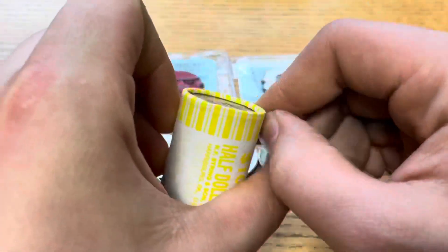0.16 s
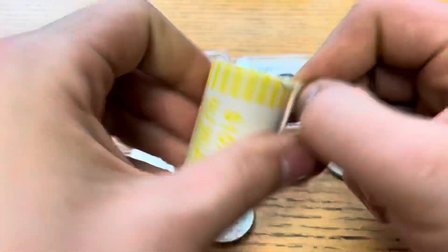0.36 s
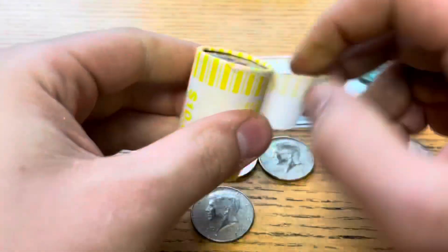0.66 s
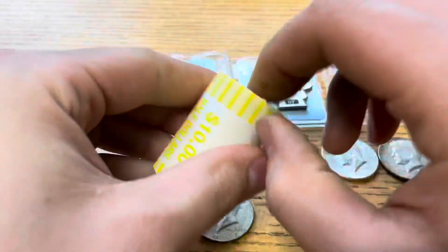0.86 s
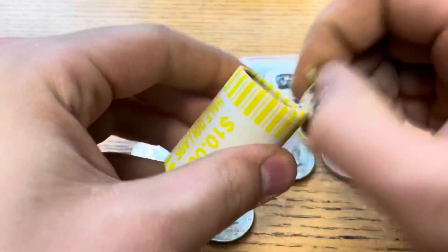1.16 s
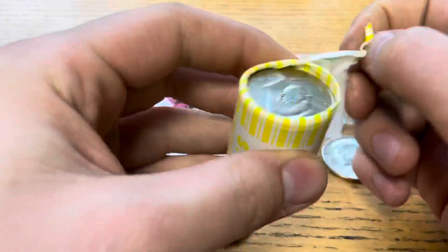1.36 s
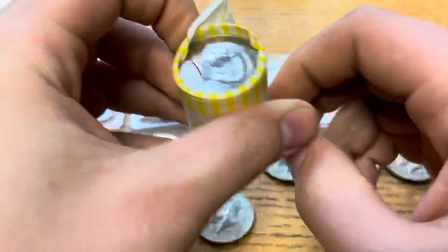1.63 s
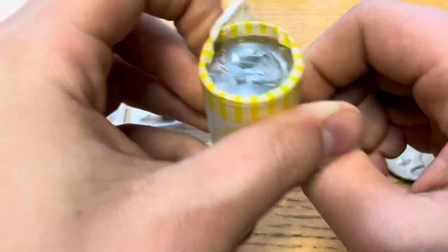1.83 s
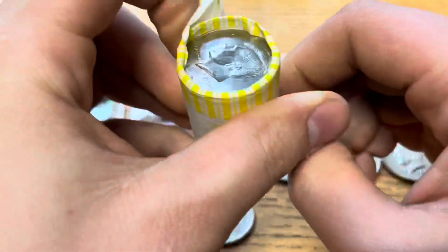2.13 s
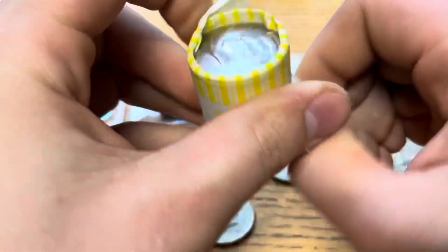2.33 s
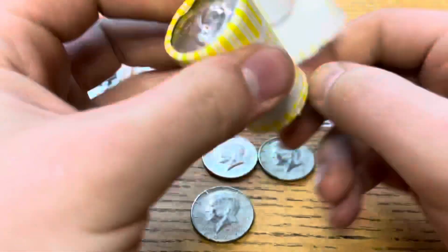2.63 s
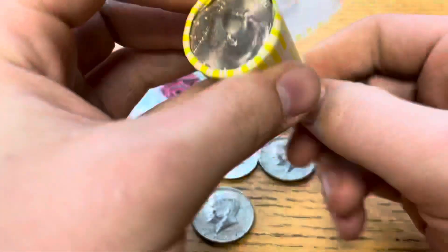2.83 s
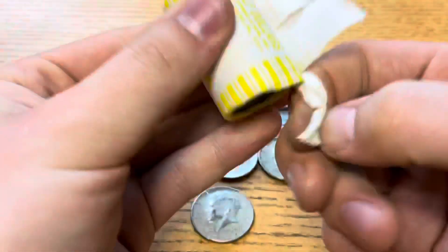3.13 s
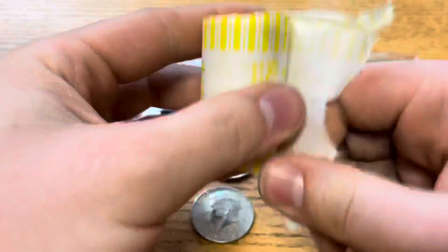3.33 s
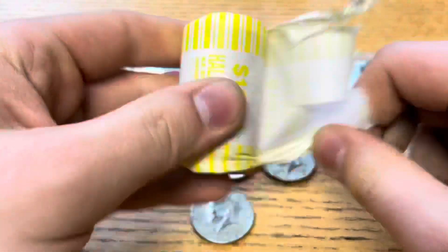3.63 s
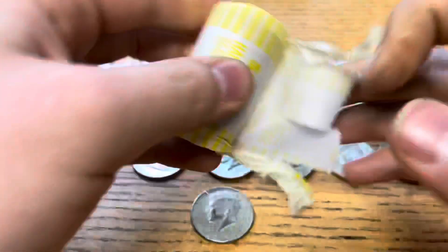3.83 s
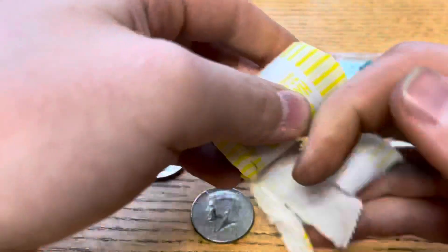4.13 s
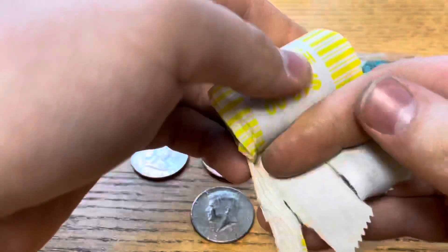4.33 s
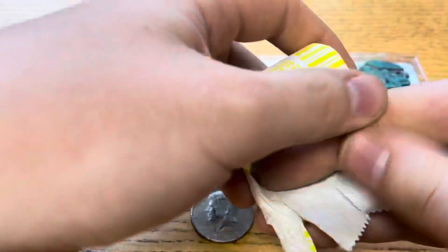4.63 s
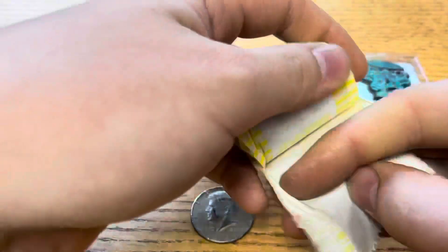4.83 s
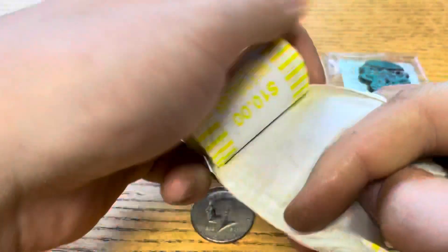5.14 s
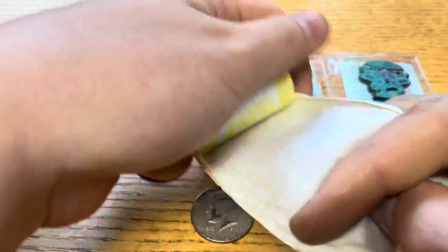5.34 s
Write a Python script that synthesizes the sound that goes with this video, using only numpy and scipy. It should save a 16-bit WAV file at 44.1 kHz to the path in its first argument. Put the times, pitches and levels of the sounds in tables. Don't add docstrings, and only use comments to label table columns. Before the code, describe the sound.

Near, crisp paper sounds over a low, faint air rumble: a brief bright rip, scattered ticks and soft thuds of fingers on the roll, a quiet pause, then another quick rip with papery flutter. Irregular crinkles and a strong snap lead to a dense burst of wide, hollow ripping and snapping. Indoors at a table, almost no reverberation, close stereo phone microphones.

```python
import sys
import numpy as np
from scipy import signal
from scipy.fft import rfft, irfft, next_fast_len
from scipy.io import wavfile
from scipy.ndimage import uniform_filter1d, map_coordinates

SR = 44100
rng = np.random.default_rng(int(sys.argv[2]) if len(sys.argv) > 2 else 0)


def field_ratio(decibels):
    return 10 ** (np.asarray(decibels, dtype=float) / 20)


def unload_wav(signal):
    wavfile.write(
        sys.argv[1],
        SR,
        np.round(np.clip(np.atleast_2d(signal).T, -1, 1) * 32767).astype(np.int16),
    )


N = 242285
COARSE_S = np.arange(0, N + 32, 32) / SR

# (frequency [Hz], gain [dB])
FIBRE_GAIN = [(5000, -38), (7000, -7), (9000, 2), (11000, -3), (13000, -1), (15000, -3), (16300, -32),
              (16900, -62.5)]
# (frequency [Hz], gain [dB])
FLAP_GAIN = [(2500, -40), (3500, -2.5), (4300, -2), (5400, -1.5), (6000, -0.5), (7200, 4), (9500, -36.5)]
# (frequency [Hz], gain [dB])
BELLY_GAIN = [(1300, -34.5), (2100, -6), (2600, -2.5), (3100, -4), (3600, -2.5), (4500, -34)]
# (frequency [Hz], width [Hz], gain [dB])
HOLLOW_MODES = [(368, 660, -7), (950, 160, 1), (1560, 350, -2)]

# (time [s], level [dB], flap width [0-1])
CONTACT = [(0, -81, 0.7), (.15, -78, 0), (0.499, -75, 0.4), (.65, -59, 0.83), (.8, -70, 0.34),
           (.95, -75, 0), (1.281, -60, 0.92), (1.55, -66, 0.54), (2.179, -73, 0.54), (2.45, -69, 0.94),
           (2.7, -86, 0.6), (2.901, -58, 0.46), (3.071, -64, 0.84), (3.65, -63, 0.85), (4, -49.5, 0.77),
           (4.55, -57, 0.77), (5.01, -47.5, 0.87), (5.49, -45, 0.86)]
# (start [s], length [s], level [dB], first width [0-1], last width [0-1])
RIPS = [
    (0.275, 0.15, -20, 0.27, 0.94),
    (2.216, 0.06, -41.5, -.2, -.2),
    (2.297, 0.11, -24.5, 0.12, 0.86),
    (3.366, 0.093, -29.5, 0.66, 0.92),
    (4.899, 0.076, -24, .7, 0.75),
    (5.192, 0.068, -25.5, 0.74, 0.89),
]
# (share of length [0-1], level [dB], share of widening [0-1])
RIP_SHAPE = [(0, -1, 0.024), (0.499, -1, 0.72), (.85, -4, 0.85), (1, -11, 0.89)]
# (release [s], build-up [s], level [dB], width [0-1], slack [dB])
PEELS = [(0.261, 0.08, -33.5, 0.52, -13), (0.571, 0.087, -44.5, 0.78, 2), (0.889, 0.044, -43.5, 0.66, -3),
         (1.177, 0.11, -35.5, 0.41, 6.5), (1.204, 0.11, -32.5, 0.57, 5.5), (1.363, 0.16, -46.5, 0.82, -1.5),
         (1.645, 0.044, -59, 0.23, 5), (1.923, 0.047, -53.5, 0.35, 4), (2.027, 0.041, -56.5, 0.43, 6),
         (2.301, 0.092, -26, 0.15, -3.5), (2.325, 0.05, -31.5, .4, 12), (2.506, 0.02, -49, 1.24, -8),
         (2.623, 0.18, -49.5, 0.72, -0.5), (2.718, 0.094, -56.5, 0.89, -5),
         (2.828, 0.066, -47.5, 0.6, -2.5), (3.102, 0.03, -39.5, 0.54, 0.5), (3.26, 0.13, -41.5, 0.74, 1),
         (3.582, .09, -37.5, 0.88, -1.5), (4.213, 0.14, -37, 0.93, 7), (4.346, 0.044, -45, 0.92, 1),
         (4.656, 0.086, -41, 0.82, -0.5), (4.901, 0.23, -27, 0.76, 3), (5.111, 0.056, -36, 0.92, 0),
         (5.444, 0.37, -39, 0.97, 0.5)]
# (start [s], dying [s], level [dB], width [0-1], slack [dB])
FLICKS = [
    (0.194, 0.14, -47, .35, -19),
    (0.704, 0.051, -44, 0.9, -5),
    (1.012, 0.17, -42, 0.05, 11.5),
    (2.212, 0.35, -43.5, 0.56, -1),
    (2.951, 0.098, -32, 0.51, 6.5),
    (3.301, 0.28, -33, 0.63, -2),
    (3.726, 1, -49, 0.9, -2),
    (4.418, 0.14, -38, 0.92, -1),
]
# (start [s], length [s], first pitch [Hz], last pitch [Hz], share [dB])
SINGS = [
    (.305, .15, 3400, 1000, -2.5),
    (2.344, .072, 2600, 1200, -1),
    (3.55, .06, 912, 921, 5.5),
    (4.047, .028, 1650, 1640, 11),
    (4.155, 0.022, 950, 956.6, 1),
    (4.184, .04, 4050, 3850, 2),
    (4.88, .11, 1235, 1020, -5),
    (5.21, 0.02, 1154, 1067, 0.5),
]

# (time [s], peak [dB], flap below fibre [dB])
EARLY_SPLITS = [(0.1127, -58, 18), (0.1352, -50, 16), (0.2126, -32, 17), (0.2185, -25, 15.5),
                (0.2476, -30, 19), (0.2651, -22, 25.5), (0.2733, -19, 23.5), (0.276, -17, 24),
                (0.278, -13.5, 20.5), (0.3166, -15, 13.5), (0.3294, -17, 17), (0.334, -16, 14),
                (0.3361, -12, 12.5), (0.3601, -17, 10), (0.3684, -14, 7), (0.3707, -16, 10.5),
                (0.376, -16, 0), (0.3923, -11, 8), (0.404, -22.5, 13), (0.414, -16, 12.5), (0.4172, -15, 17),
                (0.4341, -27, 8), (0.699, -37, -0.5), (0.7193, -31, 15), (0.8028, -56, 13.5),
                (0.9871, -49, 11), (0.9893, -49, 18), (1.0139, -28, 7.5), (1.0964, -31, 13),
                (1.1059, -35, 17), (1.1113, -36, 12.5), (1.1312, -33, 15), (1.154, -32, 8.5),
                (1.1706, -27, 9), (1.1724, -28, 9), (1.1894, -30, 10.5), (1.1914, -28, 11), (1.1961, -33, 8),
                (1.2035, -35, 6), (1.2298, -30, 9), (2.1191, -45.5, 27.5), (2.1278, -45, 21),
                (2.1587, -48.5, 20), (2.1668, -53, 18.5), (2.2218, -23, 12), (2.2283, -21, 11),
                (2.2332, -19, 26), (2.2376, -21, 28), (2.2469, -23, 19), (2.25, -18, 26), (2.2549, -24, 23),
                (2.26, -27, 25), (2.272, -24, 28), (2.2933, -17, 8), (2.301, -17, 8), (2.304, -17, 3),
                (2.3174, -8.5, 15), (2.345, -24, 15), (2.3489, -25, 10)]
# (time [s], peak [dB], flap below
# fibre [dB])
LATE_SPLITS = [(2.3526, -18, 9), (2.3651, -18, 9), (2.3739, -24, 11), (2.397, -21, 8), (2.3992, -24, 10),
               (2.4033, -24, 8), (2.414, -29, 6), (2.7597, -32, 8), (2.7615, -43, 11), (2.83, -31, 14),
               (2.8416, -49, 21), (2.8676, -49, 20), (2.8898, -44, 21), (2.9837, -33, 14), (3.1135, -37, 9),
               (3.1687, -37.5, 2), (3.1769, -29, 27), (3.1866, -22, 12), (3.3118, -29, 11),
               (3.3999, -21, 4), (3.4342, -21, 3), (3.5346, -37, 10), (3.542, -29, 1), (4.418, -13.5, -1),
               (4.6482, -32, 9), (4.716, -36, 2), (4.749, -34, -4), (4.7617, -31, 2), (4.868, -26, 9),
               (4.8815, -11.5, 4), (4.9026, -23, 7), (4.9252, -16, 1), (4.933, -19, 8), (4.9404, -24, 5),
               (4.9602, -31, 2), (4.9618, -27, 1), (4.984, -11, 11), (5.0763, -24, 6), (5.117, -20, -5),
               (5.1299, -26, 3), (5.1438, -26, 3), (5.1597, -34, 5), (5.181, -24, 9), (5.186, -21.5, 9),
               (5.1998, -22, 7), (5.214, -11.5, 15), (5.2171, -18.5, 6), (5.2328, -19, 9), (5.2632, -15, 9),
               (5.2695, -7, 9), (5.2728, -11.5, 3), (5.2739, -6.5, 10), (5.419, -25, 11)]
# (time [s], peak [dB], flap below fibre [dB])
TICKS = [(0.1685, -52, 21.5), (0.1918, -48, 10), (.246, -35.5, 21.5), (.444, -28, 16.5), (0.57, -35.5, 7),
         (1.0341, -30, 21), (2.031, -40, 8.5), (2.21, -34, 15.5), (2.4135, -39, 3), (2.492, -47, 8),
         (2.7909, -31.5, 13), (2.825, -40, 11), (3.1835, -27.5, 13.5), (3.4223, -24, 22),
         (4.6508, -35.5, 11), (5.115, -26.5, 17), (5.1852, -28, 5), (5.2453, -23, 10.5), (5.293, -29, 2)]
STRAYS_S = [1.479, 1.547, 1.614, 1.712, 2.072, 2.118, 2.159, 2.166]
# (time [s], peak [dB], flap pitch [Hz], fibre share [dB])
CREASES = [(0.3757, -27, 5300, 5), (0.3932, -32, 5500, 10.5), (1.0146, -44.5, 4270, 4),
           (1.202, -39.5, 4910, -14), (2.3009, -31.5, 4980, -8), (2.4244, -45, 6900, -9),
           (2.9479, -33, 3600, 4.5), (2.9524, -25, 4230, -12), (3.1068, -39, 3860, -9.5),
           (3.377, -28.5, 2800, -2), (3.3983, -30, 4600, -4), (3.4357, -21, 5150, -2),
           (3.74, -40, 4360, -1), (4.264, -46, 5500, -17), (4.3483, -38.5, 7100, 1),
           (4.4173, -19, 2730, -12.5), (4.448, -36.5, 2480, -18), (4.713, -41, 4140, 4),
           (4.7489, -37, 3400, -15), (3.754, -46.5, 2700, -9), (4.7625, -32, 4970, -8),
           (4.7841, -25, 3480, -1), (4.847, -26, 7540, 0), (4.9178, -19, 7300, -14),
           (4.9423, -22, 6900, -13), (5.0735, -23.5, 4950, -1), (5.094, -30.5, 6400, -3),
           (5.1069, -28.5, 5100, 9), (5.122, -18.5, 3220, -5), (5.2014, -19.5, 3150, -8),
           (5.2633, -31, 6500, -4), (5.2715, -13, 6600, -9)]
# (time [s], peak [dB], pitch [Hz], brightness [dB])
POPS = [(0.5778, -38, 640, -4), (0.7003, -34, 501, -4.5), (1.357, -37, 600, -2.5),
        (1.3704, -43.5, 593, -10), (2.3954, -50.5, 1414, -20), (2.501, -34.5, 1270, -11),
        (2.5097, -35, 1550, 1.5), (2.7633, -40.5, 540, -3.5), (2.7915, -49.5, 1500, -4),
        (2.826, -53, 1290, -3), (3.4003, -27.5, 620, -18), (3.4368, -30, 910, -18), (3.4595, -21, 570, -33),
        (3.541, -40.5, 440, 0.5), (4.093, -38.5, 1550, -5), (4.449, -35.5, 950, -32),
        (4.601, -50.5, 450, 4), (4.831, -16.5, 1490, -12), (4.881, -17, 1400, -7),
        (4.884, -22.5, 1100, -14), (4.912, -20, 1624, -16), (4.915, -21, 1040, -5),
        (4.94, -27.5, 1190, -10), (4.977, -19.5, 1070, -1.2), (4.9843, -27.5, 1500, 4.5),
        (5.0482, -27.5, 1600, -9.5), (5.0793, -30, 1044, 1.5), (5.122, -22, 2400, -9),
        (5.1366, -42, 2200, 11), (5.2133, -20.5, 950, -1), (5.271, -19.5, 756, -15),
        (5.2782, -23, 1150, -7), (5.4475, -26, 1280, -2.5)]
# (time [s], peak [dB], pitch [Hz])
BUMPS = [(0.577, -37.5, 219), (0.697, -43, 482), (1.355, -37, 226), (2.516, -30.5, 231), (2.762, -39, 570),
         (3.26, -31.5, 225), (3.324, -33, 333), (3.395, -25, 297), (3.413, -27, 370), (3.457, -52, 610),
         (3.497, -45, 200), (3.586, -28.5, 483), (3.917, -36, 660), (4.418, -30, 247), (4.4189, -34, 443),
         (4.419, -35, 135), (4.454, -44, 244)]
# (time [s], level [dB])
HANDS = [(0, -79), (.15, -66.5), (.4, -57), (.6, -63), (.95, -62), (1.35, -56), (1.55, -77), (2.2, -77.5),
         (2.6, -61), (3.3, -64.5), (4, -52.5), (4.6, -74), (5.49, -67)]

# (frequency [Hz], lead [rad])
LEAD = [(0, 0), (600, .3), (860, -.1), (1890, .8), (2410, .6), (3010, 2), (3880, .7), (5340, 0),
        (5940, -1.7), (7400, -2.4), (8800, -3.15), (10200, -4), (12000, -5.6), (14000, -6.25)]
# (frequency [Hz], level [dB])
TILT = [(60, 1), (150, 1.5), (380, 5), (950, 5), (2380, 6), (5980, 1.5), (15000, 0)]
# (frequency [Hz], level [dB])
DIFFUSE = [(300, -7), (1000, -4.5), (1800, -6), (3000, -7), (5500, -4), (8500, -9.5), (11500, -1.5),
           (15000, -13)]
# (frequency [Hz], density [dB per Hz])
RUMBLE = [(12, -58), (20, -33.5), (37, -21.5), (59, -3.5), (80, 1), (92, -11), (129, -3.5), (156, -2.5),
          (195, -6.5), (393, -31), (900, -62.5), (1170, -88), (1980, -120)]

BUILD_DB, DIE_DB = 26, 32.5
ONSET_DB_PER_S, RELEASE_DB_PER_S, RIP_ONSET_DB_PER_S, SING_FADE_DB_PER_S = 1194, 604, 3199.5, 789.5
FIBRE_DULL_DB, FLAP_GAIN_DB, HOLLOW_GAIN_DB = 6.5, 14.5, 40.5
GLIDE_SHARE = .6
TICK_HZ, DULL_HZ, POP_UNDER_DB = (3800, 7460), (504, 2200), 18
STRAY_DB, STRAY_UNDER_DB = -57, 15
SPLIT_T60_S, SPLIT_FLAP_T60_S, SPLIT_ECHO_DB = .0038, .007, -2
RUMBLE_DB = -51.5


def crackle():
    fibre_db, flap_db, hollow_db = activity()
    panel_hz, share_db = singing()
    slip = field_ratio(0.6 * wobble(70) + 1.8 * wobble(300))
    shared = unit(slip * breaks(9000, spread_db=1.28))
    bright, mid, low = creases()

    fibre = coloured(field_ratio(fibre_db + 3.0) * shared + bright, causal(FIBRE_GAIN))
    flap_drive = shared + 1.03 * own_breaks(60)
    flap = coloured(field_ratio(flap_db - 6.5) * flap_drive + mid, causal(FLAP_GAIN))
    belly_db = 0.59 * flap_db + 0.46 * hollow_db - 4.0
    belly_drive = 0.72 * shared + 0.54 * own_breaks(55)
    belly = coloured(field_ratio(belly_db) * belly_drive + low, causal(BELLY_GAIN))
    left_over = np.sqrt(np.clip(1 - field_ratio(2 * share_db), .1, 1))
    air_drive = 0.83 * shared + 0.91 * own_breaks(40)
    air = coloured(field_ratio(hollow_db - 5.0) * left_over * air_drive,
                   lambda hz: pocket(hz) * hz * hz / (hz * hz + 350 ** 2))
    rustle = patchy(fibre + flap + belly + air, depth_db=1.9, turn_rad=0)
    panel_db = 0.74 * hollow_db + 0.24 * flap_db + share_db - 2.0
    return rustle + field_ratio(panel_db) * panel_tone(panel_hz)


def breaks(rate_hz, spread_db):
    draw = rng.random((2, N))
    size = field_ratio(-spread_db * np.log(draw[1] + 1e-4))
    return (draw[0] < rate_hz / SR) * size * rng.standard_normal(N)


def own_breaks(rate_hz):
    return unit(field_ratio(3.4 * wobble(rate_hz)) * breaks(5000, spread_db=0.6))


def panel_tone(panel_hz):
    drive = np.array([own_breaks(50), own_breaks(50)])
    drive = filtered(drive, lambda hz: 1 / (1 + 1j * hz / 320) ** 2)
    turn = 2 * np.pi * np.cumsum(panel_hz) / SR
    return unit(drive[0] * np.cos(turn) + drive[1] * np.sin(turn))


def pocket(hz):
    total = 0
    for k, (centre, width, db) in enumerate(HOLLOW_MODES):
        damping = 1j * hz * width
        total = total + (-1) ** k * field_ratio(db) * damping / (centre * centre - hz * hz + damping)
    return total


def activity():
    shares, sag_db, grown = np.transpose(RIP_SHAPE)
    at, rest_db, rest_width = np.transpose(CONTACT)
    moves = [(np.interp(COARSE_S, at, rest_db), np.interp(COARSE_S, at, rest_width), 0)]
    for s, length, db, first, last in RIPS:
        level = gesture(s, length, db + sag_db, shares, rise=RIP_ONSET_DB_PER_S)
        width = first + (last - first) * np.interp(COARSE_S, s + length * shares, grown)
        moves.append((level, width, 0))
    for s, length, db, width, slack in PEELS:
        moves.append((gesture(s - length, length, [db - BUILD_DB, db]), width, slack))
    for s, length, db, width, slack in FLICKS:
        moves.append((gesture(s, length, [db, db - DIE_DB]), width, slack))
    power = 0
    for db, width, slack in moves:
        fibre_db = db - FIBRE_DULL_DB * width
        flap_db = db + slack - FLAP_GAIN_DB * (1 - width)
        hollow_db = db - HOLLOW_GAIN_DB * (1 - width)
        power = power + field_ratio(2 * np.array([fibre_db, flap_db, hollow_db]))
    return [fine(layer) for layer in 10 * np.log10(power + 1e-20)]


def gesture(s, length, levels_db, shares=(0, 1), rise=ONSET_DB_PER_S, fall=RELEASE_DB_PER_S):
    inside = np.interp(COARSE_S, s + length * np.asarray(shares), levels_db)
    before = np.clip(s - COARSE_S, 0, None)
    after = np.clip(COARSE_S - s - length, 0, None)
    return inside - rise * before - fall * after


def singing():
    pitch, share = [], []
    for s, length, first_hz, last_hz, db in SINGS:
        pitch += [(s, np.log(first_hz)), (s + GLIDE_SHARE * length, np.log(last_hz))]
        share.append(gesture(s, length, [db, db], rise=SING_FADE_DB_PER_S, fall=SING_FADE_DB_PER_S))
    return np.exp(curves(pitch)[0]), fine(np.max(share, axis=0))


def creases():
    bursts, t = np.zeros((3, N + SR)), np.arange(SR // 30) / SR
    t60_s = np.array([[.006], [.008], [.009]])
    fade = field_ratio(-60 * t / t60_s) + field_ratio(-21.0 - 60 * t / 0.021)
    fade = fade * (1 - np.exp(-t / 0.0001))
    for s, fibre_db, flap_db, _, pop_db, _ in snap_rows():
        belly_db = 0.62 * flap_db + 0.4 * pop_db + 3.0
        level = field_ratio([[fibre_db + 7.5], [flap_db + 3.5], [belly_db]])
        start = round(s * SR)
        bursts[:, start:start + len(t)] += level * fade * rng.standard_normal((3, len(t)))
    return bursts[:, :N]


def snap_rows():
    def pick(band):
        return band[0] * (band[1] / band[0]) ** rng.random()

    rows = []
    for s, db, under in list(TICKS) + [(s, STRAY_DB, STRAY_UNDER_DB) for s in STRAYS_S]:
        flap_db = db - under
        rows.append((s, db, flap_db, pick(TICK_HZ), flap_db - POP_UNDER_DB, pick(DULL_HZ)))
    for s, db, hz, share in CREASES:
        rows.append((s, db + share, db, hz, db - POP_UNDER_DB - 7.0, pick(DULL_HZ)))
    for s, db, hz, bright in POPS:
        rows.append((s, db + bright, db + bright - 3.5, pick(TICK_HZ), db, hz))
    return rows


def splits():
    out, t = np.zeros((2, N + SR)), np.arange(SR // 100) / SR
    fade = field_ratio(-60 * t / np.array([[SPLIT_T60_S], [SPLIT_FLAP_T60_S]]))
    fade_norm = np.linalg.norm(fade, axis=1, keepdims=True)
    for s, db, under in list(EARLY_SPLITS) + list(LATE_SPLITS):
        burst = fade * rng.standard_normal(fade.shape)
        burst *= fade_norm / np.linalg.norm(burst, axis=1, keepdims=True)
        start = round(s * SR)
        out[:, start:start + len(t)] += field_ratio([[db + 2.5], [db - under - 5.5]]) * burst
    return coloured(out[0, :N], causal(FIBRE_GAIN)) + coloured(out[1, :N], causal(FLAP_GAIN))


def snaps():
    tone, t = np.zeros(N + SR), np.arange(SR // 30) / SR
    for s, _, flap_db, flap_hz, pop_db, pop_hz in snap_rows():
        jitter = rng.standard_normal((2, len(t)))
        tick = field_ratio(flap_db + 5.5) * ring(t, flap_hz, 0.011, 0.13 * jitter[0])
        pop = field_ratio(pop_db + 7.0) * ring(t, pop_hz, 0.005 + 7 / pop_hz, 0.12 * jitter[1])
        tone[round(s * SR):][:len(t)] += tick + pop
    return filtered(tone[:N], lambda hz: (1j * hz / (450 + 1j * hz)) ** 2)


def ring(t, hz, t60_s, jitter_rad):
    envelope = field_ratio(-60 * t / t60_s) * (1 - np.exp(-t * hz / 0.17))
    return envelope * np.sin(2 * np.pi * hz * t + np.cumsum(jitter_rad))


def bumps():
    out, t = np.zeros(N + SR), np.arange(SR // 10) / SR
    for s, db, hz in BUMPS:
        jitter = 0.07 * rng.standard_normal(len(t))
        out[round(s * SR):][:len(t)] += field_ratio(db + 2.5) * ring(t, hz, 9 / hz, jitter)
    return out[:N]


def hands():
    rub = field_ratio(3.6 * wobble(25)) * rng.standard_normal(N)
    rub = coloured(rub, lambda hz: 1j * hz * 260 / (370 ** 2 - hz * hz + 1j * hz * 260))
    return field_ratio(curves(HANDS)[0] - 7.5) * rub


def ports(x):
    side = np.array([[.5], [-.5]])
    return filtered(x, lambda hz: field_ratio(side * along(TILT, hz)) * np.exp(1j * side * along(LEAD, hz)))


def echoes(x, t60_s):
    t = np.arange(SR // 5) / SR
    decay = field_ratio(-60 * t / t60_s) + field_ratio(-43.5 - 60 * t / 0.47)
    tail = rng.standard_normal((2, len(t))) * decay
    tail = tail / np.linalg.norm(tail[1])
    late = np.pad(x, (30, 0))[None]
    wet = signal.fftconvolve(late, tail, axes=1)[:, :N]
    return filtered(wet, lambda hz: field_ratio(along(DIFFUSE, hz)))


def patchy(x, depth_db, turn_rad):
    z = signal.stft(x, nperseg=512)[2]
    field = rng.standard_normal((2,) + z.shape, dtype=np.float32)
    field = uniform_filter1d(field, size=5, axis=-2)
    field = uniform_filter1d(field, size=6, axis=-1) * np.sqrt(5 * 6)
    z = z * field_ratio(depth_db * field[0]) * np.exp(1j * turn_rad * field[1])
    return signal.istft(z, nperseg=512)[1][..., :N]


def ventilation():
    mid, side = filtered(rng.standard_normal((2, N)), lambda hz: field_ratio(along(RUMBLE, hz)))
    side = field_ratio(-15.0) * side + 0.07 * mid
    return field_ratio(RUMBLE_DB + 0.19 * wobble(2.9)) * unit(np.array([mid + side, mid - side]))


def unit(x):
    return x / np.sqrt(np.mean(x ** 2) + 1e-20)


def along(points, hz):
    f, v = np.transpose(points)
    return np.interp(np.log(hz + 1), np.log(f + 1), v)


def filtered(x, response):
    m = next_fast_len(N + SR // 10)
    return irfft(rfft(x, m) * response(np.fft.rfftfreq(m, 1 / SR)), m)[..., :N]


def coloured(x, response):
    def scaled(hz):
        gain = response(hz)
        return gain / np.sqrt(np.mean(np.abs(gain) ** 2))

    return filtered(x, scaled)


def causal(points):
    grid = np.fft.rfftfreq(4096, 1 / SR)
    cepstrum = irfft(np.log(field_ratio(along(points, grid)) + 1e-6))
    half = len(cepstrum) // 2
    cepstrum[1:half] *= 2
    cepstrum[half + 1:] = 0
    log_gain = rfft(cepstrum)
    return lambda hz: np.exp(np.interp(hz, grid, log_gain.real) + 1j * np.interp(hz, grid, log_gain.imag))


def wobble(rate_hz):
    coarse = np.arange(0, N + 16, 16)
    knots = rng.standard_normal(int(N * rate_hz / SR) + 4)
    return np.interp(np.arange(N), coarse, map_coordinates(knots, [coarse * rate_hz / SR]))


def curves(rows):
    s, *cols = np.transpose(rows)
    return [np.interp(np.arange(N) / SR, s, c) for c in cols]


def fine(curve):
    return np.interp(np.arange(N) / SR, COARSE_S, curve)


def scene():
    paper = crackle() + snaps() + bumps() + hands()
    sharp = splits()
    wet = echoes(paper + field_ratio(SPLIT_ECHO_DB) * sharp, t60_s=0.013)
    return ports(paper + sharp) + patchy(wet, depth_db=2.5, turn_rad=2.49) + ventilation()


def band_limit(x):
    return signal.sosfilt(signal.butter(12, 16810, fs=SR, output="sos"), x)


def record(dry):
    held = dry / (1 + np.abs(dry / .66) ** 6) ** (1 / 6)
    return band_limit(held)


dry = scene()
out = record(dry)
unload_wav(out)
```